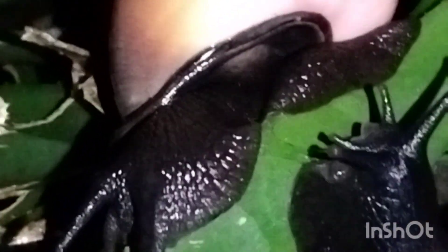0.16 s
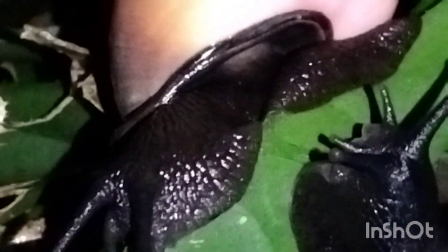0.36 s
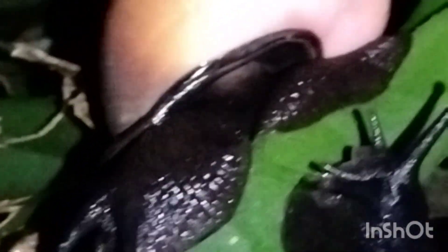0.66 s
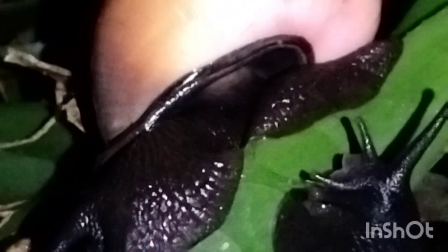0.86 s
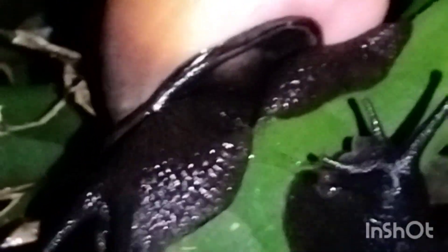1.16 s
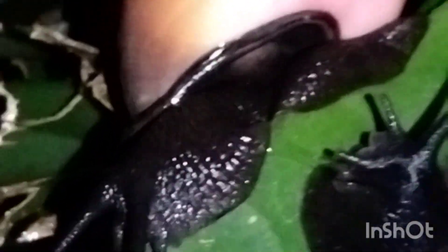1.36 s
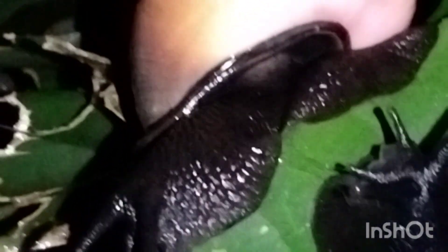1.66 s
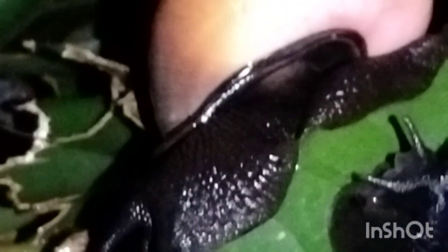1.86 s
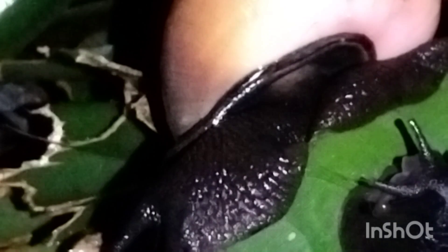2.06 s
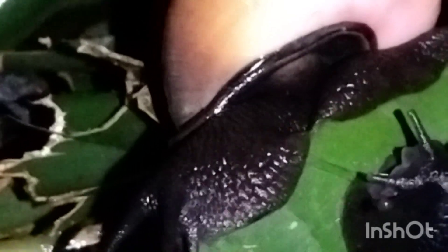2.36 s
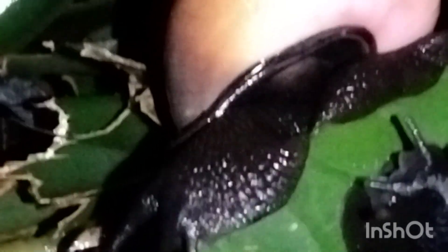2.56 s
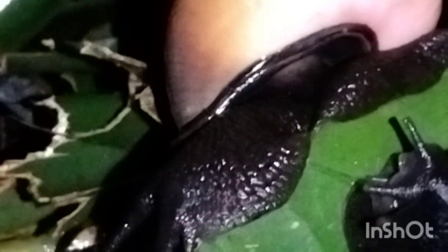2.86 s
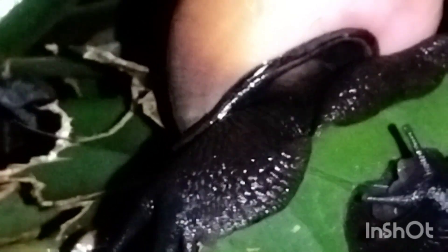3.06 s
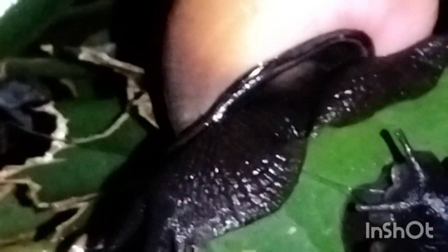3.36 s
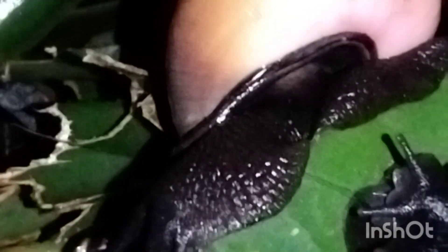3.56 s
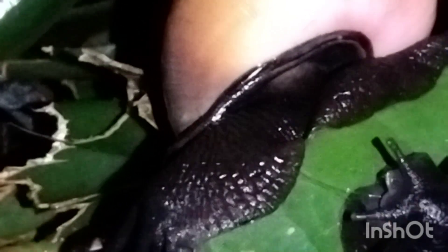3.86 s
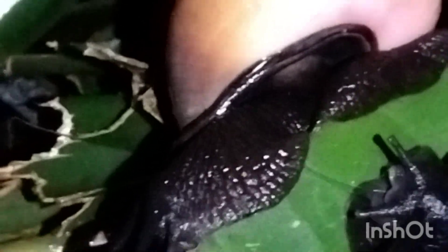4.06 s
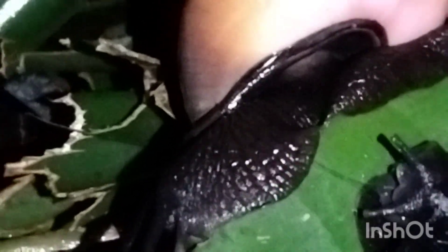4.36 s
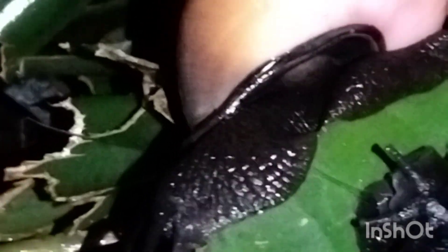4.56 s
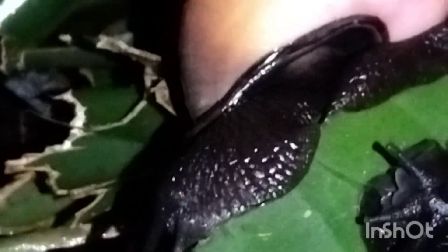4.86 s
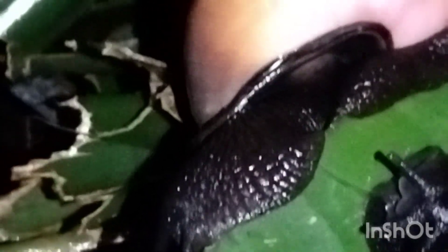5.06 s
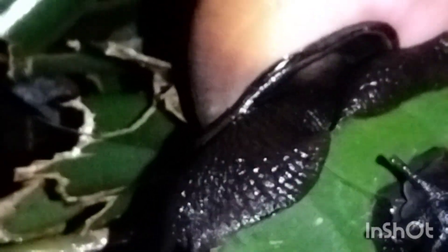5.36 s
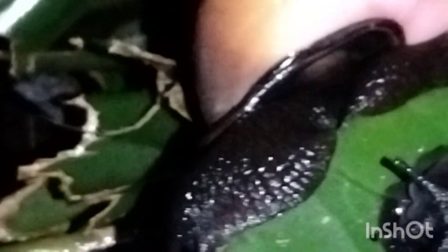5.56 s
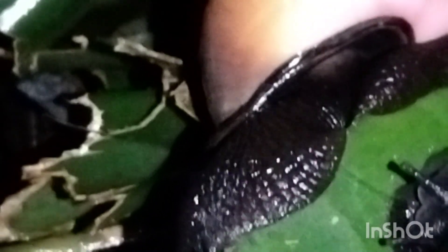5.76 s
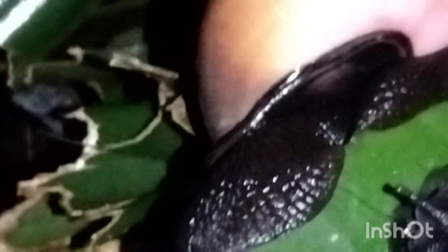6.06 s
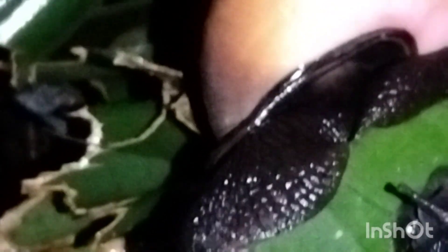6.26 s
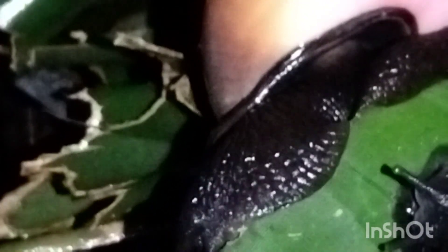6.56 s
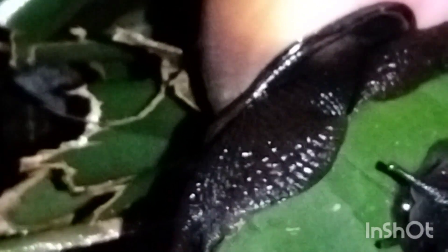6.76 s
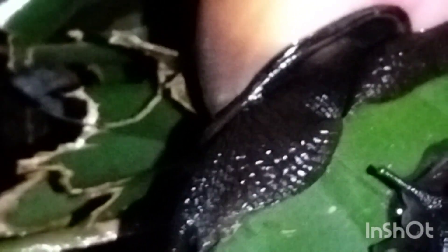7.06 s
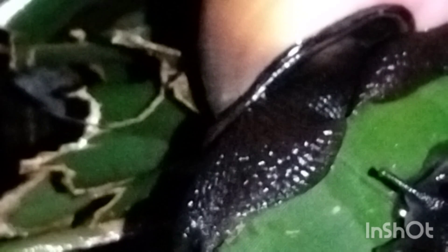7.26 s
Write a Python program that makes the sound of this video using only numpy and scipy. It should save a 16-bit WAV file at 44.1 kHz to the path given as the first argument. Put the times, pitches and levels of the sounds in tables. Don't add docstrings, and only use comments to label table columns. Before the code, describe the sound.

A wet garden at night, continuous from start to end, picked up by a phone held still among leaves, with slight noise-suppressed graininess and no extreme treble. A near tree cricket gives short chirps of five quick pulses, each falling slightly around 2.7 kHz, roughly every 0.37 s; one near 6.0 s has only three. Far frogs of two sizes croak in overlapping, rattling pulses, busy until about 2.5 s, thinner around 3-4.5 s, then led by the smaller frogs from 5 s. A strong, piercing cricket near 7.6 kHz chirps at 0.5, 1.9, 3.3, 4.7 and 6.2 s. Pulsed trills with upward-sweeping strokes near 5 kHz run about 1.0-1.9, 3.1-4.0 and 5.3-6.1 s. Other crickets shimmer constantly at 5.6 kHz and chirp in groups around 7 kHz. Drips tick brightly on leaves, notably at 1.5, 2.2, 2.4 and 7.0 s, with soft low thuds, clearest near 4.8 s.

```python
import sys
import numpy as np
from scipy import signal
from scipy.fft import rfft, irfft
from scipy.io import wavfile
from scipy.ndimage import uniform_filter1d

SR = 44100
rng = np.random.default_rng(int(sys.argv[2]) if len(sys.argv) > 2 else 0)


def attenuation_scalar(level_db):
    decades = np.asarray(level_db, float) / 20
    return 10 ** decades


def log_audio(samples):
    frames = np.atleast_2d(samples).T
    limited = np.clip(frames, -1, 1)
    pcm = np.round(limited * 32767).astype(np.int16)
    wavfile.write(sys.argv[1], SR, pcm)


N = 327663
TIME = np.arange(N) / SR


def add(out, x, t):
    i = int(t * SR)
    first, last = max(i, 0), int(np.clip(i + len(x), 0, N))
    out[first:last] += x[first - i:][:last - first]


def unit(x):
    return x / np.sqrt(np.mean(x ** 2))


def band(x, lo_hz, hi_hz, order=2):
    sos = signal.butter(order, [lo_hz, min(hi_hz, .45 * SR)], "band", fs=SR, output="sos")
    return signal.sosfilt(sos, x)


def walk(rate):
    hold = int(SR / rate)
    steps = np.repeat(rng.standard_normal(N // hold + 1), hold)
    return unit(uniform_filter1d(uniform_filter1d(steps, hold), hold)[:N])


def level_curve(table):
    s, db = np.transpose(table)
    return attenuation_scalar(np.interp(TIME, s, db))


def calls(starts, lengths, levels_db, attack, t60):
    power = np.full(N // 64 + 2, 1e-12)
    t = np.arange(len(power)) * 64 / SR
    for start, length, db in zip(starts, lengths, levels_db):
        swell = np.clip((t - start) / attack + (start <= 0), 0, 1)
        fade_db = -60 * np.clip(t - start - length, 0, None) / t60
        power += (swell * attenuation_scalar(db + fade_db)) ** 2
    return np.interp(TIME, t, np.sqrt(power))


def foliage(x, t60, wet_db):
    t = np.arange(int(.5 * SR)) / SR
    fade = np.exp(-np.log(1000) * t / t60) * (1 - np.exp(-t / 0.0027))
    tail = rng.standard_normal(len(t)) * fade
    return x + attenuation_scalar(wet_db) * signal.fftconvolve(x, tail / np.sqrt(np.sum(tail ** 2)))[:N]


def wing(phase, overtone, overtone_db):
    return np.sin(phase) + attenuation_scalar(overtone_db) * np.sin(overtone * phase)


def stroke(out, top_s, db, start_hz, end_hz, glide, rise, fall, overtone, overtone_db):
    t = np.arange(int((rise + fall) * SR)) / SR
    rising = np.sin(np.pi / 2 * t / rise)
    falling = np.cos(np.pi / 2 * np.clip((t - rise) / fall, 0, 1)) ** 1.3
    swell = np.where(t < rise, rising, falling) ** 1.5
    settling = np.exp(-t / glide)
    hz = end_hz + (start_hz - end_hz) * settling
    phase = 2 * np.pi * (np.cumsum(hz) / SR + rng.random())
    add(out, attenuation_scalar(db) * swell * wing(phase, overtone, overtone_db - 25 * settling), top_s - rise)


def trill(hz, rate, sharp, overtone_db, wander_hz):
    beat = rate * (TIME + rng.random()) + .05 * walk(3)
    phase = 2 * np.pi * np.cumsum(hz + wander_hz * walk(12)) / SR
    pulses = np.sin(np.pi * beat) * np.abs(np.sin(np.pi * beat)) ** sharp
    return pulses * wing(phase, 2, overtone_db + 5 * walk(4.4))


def air():
    # (frequency [Hz], density [dB per Hz])
    air_colour = [(25, -32), (60, -3.5), (120, -2), (250, 1), (600, 0), (1000, 1), (2400, 10.5),
                  (4600, -1.5), (5300, -1), (6300, 9.5), (7900, 10.5), (8600, -16), (11000, -13),
                  (15500, -19.5)]
    hz, db = np.transpose(air_colour)
    bins = np.arange(N // 2 + 1) * SR / N + 1
    hiss = rfft(rng.standard_normal(N)) * attenuation_scalar(np.interp(np.log(bins), np.log(hz), db))
    out = irfft(hiss * (bins < 4000), N)
    for lo_hz in range(4000, 16000, 300):
        patch = irfft(hiss * (bins >= lo_hz) * (bins < lo_hz + 300), N)
        out += attenuation_scalar(4.5 * walk(10)) * patch
    return attenuation_scalar(-70.5) * unit(out)


def far_tree_crickets():
    # (time [s], level [dB])
    far_levels = [
        (0, -62.5),
        (2.9, -65.5),
        (3.3, -58.5),
        (4.8, -58.5),
        (5.5, -68.5),
        (6.1, -60),
        (6.6, -59.5),
        (7.0, -62),
        (7.43, -63),
    ]
    pair = sum(trill(hz, hz / 70, 1.5, -55, 20) for hz in (2790, 2860))
    return level_curve(far_levels) * attenuation_scalar(2.6 * walk(5)) * unit(foliage(pair, 0.34, 0.5))


def steady_trill():
    # (time [s], level [dB])
    steady_levels = [(0.0, -57.5), (1.66, -60), (1.82, -59), (3.06, -62.5), (3.19, -65), (3.21, -63),
                     (3.79, -60), (4.14, -66.5), (4.16, -59.5), (4.26, -62.5), (5.4, -62), (6.06, -57),
                     (7.43, -59)]
    # (time [s], level [dB])
    late_levels = [
        (6.1, -60),
        (6.31, -79),
        (6.318, -72),
        (7.43, -65.5),
    ]
    near = trill(5657, 48.56, 5., -50, 3)
    neighbour = trill(5640, 97., .5, -50, 14)
    pair = unit(foliage(near + attenuation_scalar(-3.5) * neighbour, 0.18, -16.5))
    late = sum(trill(hz, hz / 50, 1.6, -55, 90) * attenuation_scalar(5 * walk(15)) for hz in (4520, 4640, 4780))
    late = (TIME > late_levels[0][0]) * unit(foliage(late, 0.3, 8))
    return level_curve(steady_levels) * pair + level_curve(late_levels) * late


def frog_pulses(rate):
    voices = np.zeros((6, N))
    for voice in voices:
        own_pace = 1 + .06 * rng.standard_normal()
        period = SR / rate * own_pace * (1 + .025 * rng.standard_normal(int(N / 100)))
        period *= 1 + .05 * np.resize(walk(6)[::int(SR / rate)], len(period))
        at = np.cumsum(period).astype(int)
        at = at[at < N]
        scatter_db = 3.22 * rng.standard_normal(len(at))
        voice[at] = attenuation_scalar(4.97 * walk(8)[at] + scatter_db)
    return voices


def frogs():
    # (low edge [Hz], high edge [Hz], pulse rate [Hz])
    frog_bands = [
        (1172.4, 1766, 125),
        (2590, 3564, 125),
        (1574, 2747, 182),
        (3454, 4422, 182),
    ]
    far_chorus_db = [
        -76,
        -66,
        -76.5,
        -77.5,
    ]
    # (start [s], length [s], throat level [dB], sac over throat [dB])
    big_croaks = [(0.0, 0.37, -52.5, 1), (0.28, 0.19, -49.5, 0), (0.47, 0.24, -50, 1.5),
                  (0.78, 0.15, -48.5, 3.1), (0.96, 0.28, -50.5, 2.5), (1.24, 0.29, -50, 2),
                  (1.53, 0.44, -51, 3), (1.71, 0.25, -56.5, -2.2), (2.0, 0.076, -48.5, 1.5),
                  (2.18, 0.21, -50, -0.5), (2.45, 0.29, -54, -0.2), (2.75, 0.18, -52.5, -1),
                  (3.09, 0.11, -58, 5), (3.29, 0.1, -59, -0.5), (3.49, 0.2, -57.5, 2.5),
                  (3.69, 0.25, -53, -0.5), (3.94, 0.097, -54, 0.5), (4.16, 0.12, -52.5, 4),
                  (4.44, 0.091, -65, 12.5), (4.67, 0.16, -60.5, 17.5), (5.12, 0.19, -68, 16.5),
                  (5.3, 0.17, -62, 10), (5.62, 0.16, -69, 12), (5.87, 0.056, -80, 6),
                  (6.15, 0.12, -72, 12.5), (6.41, 0.45, -67, -5.5), (6.73, 0.14, -54.5, -1.5),
                  (6.94, 0.12, -64, 8.5), (7.05, 0.016, -54.5, -10), (7.17, 0.22, -56, 5.5)]
    # (start [s], length [s], throat level [dB], sac over throat [dB])
    small_croaks = [(0.0, 0.12, -46, -3), (0.155, 0.28, -44, -5), (0.444, 0.36, -45.5, -4.5),
                    (0.691, 0.4, -51, -4.5), (1.027, 0.16, -51.5, -1.5), (1.199, 0.068, -48.5, -3.5),
                    (1.454, 0.1, -49, -3), (1.71, 0.11, -50, -2.5), (1.938, 0.11, -51, -12.5),
                    (2.193, 0.11, -51, -1), (2.42, 0.18, -56, -7), (2.634, 0.27, -52, -1.7),
                    (3.067, 0.069, -49, -1.5), (3.328, 0.08, -55.5, 2), (3.709, 0.13, -52.5, 1.5),
                    (3.895, 0.04, -51.5, -1.3), (4.154, 0.065, -50.5, 2), (4.316, 0.13, -56.5, 1),
                    (4.471, 0.078, -48, 0.2), (4.656, 0.26, -49.5, -1), (4.959, 0.27, -47, -3),
                    (5.291, 0.3, -45, -3.5), (5.656, 0.27, -46, -3.5), (5.858, 0.41, -47.5, -2.5),
                    (6.166, 0.2, -45, -4.5), (6.433, 0.22, -44.5, -3.5), (6.668, 0.25, -45, -4),
                    (6.956, 0.14, -44.5, -2.1), (7.089, 0.25, -46.5, -5), (7.342, 0.081, -48, 0.2)]
    # (throat [Hz], sac [Hz])
    big_rings = [(1401, 3030), (1437, 2980), (1440, 2990), (1463, 3700), (1444, 2970), (1415, 3000),
                 (1460, 2960), (1476, 2996), (1492, 3000), (1467, 3030), (1467, 3020), (1390, 2870),
                 (1460, 2860), (1480, 3200), (1440, 3040), (1543, 3200), (1496, 3260), (1500, 2990),
                 (1410, 3200), (1670, 7200), (1500, 2800), (1538, 2910), (1570, 2820), (1540, 2780),
                 (1550, 2830), (1500, 2600), (1400, 2870), (1456, 2950), (1520, 3060), (1490, 3060)]
    # (throat [Hz], sac [Hz])
    small_rings = [(1983, 3850), (1783, 3760), (1833, 3980), (1840, 3760), (1800, 3910), (1840, 3800),
                   (1760, 3910), (1700, 3710), (1810, 4300), (1820, 4060), (1750, 3700), (1860, 3870),
                   (1950, 3870), (2260, 3920), (1840, 4200), (1980, 3940), (1990, 3770), (1870, 4100),
                   (1950, 3880), (1870, 3810), (1867, 3800), (1764, 3770), (1970, 3820), (1830, 3780),
                   (1912, 3884), (1850, 3760), (1897, 3800), (1860, 3800), (1854, 3820), (1870, 3840)]
    out = np.zeros(N)
    pulses = [frog_pulses(frog_bands[0][2]), frog_pulses(frog_bands[2][2])]
    leaning = [walk(9), walk(9)]
    for k, (lo_hz, hi_hz, _) in enumerate(frog_bands):
        kind, is_sac = k // 2, k % 2
        start, length, throat_db, sac_db = np.transpose((big_croaks, small_croaks)[kind])
        gain = calls(start, length, throat_db + is_sac * sac_db - 1.32, attack=0.014, t60=0.53)
        croak = np.searchsorted(start, TIME, "right") - 1
        rings = np.array((big_rings, small_rings)[kind], float)
        ring_hz = uniform_filter1d(rings[croak, is_sac], size=900)
        climb = 1 - 0.074 * np.exp(-(TIME - start[croak]) / 0.074)
        lead_hz = ring_hz * climb * (1 + 0.022 * leaning[kind])
        span, chorus = hi_hz - lo_hz, 0
        for voice, hz in zip(pulses[kind], np.linspace(lo_hz, hi_hz, 8)[1:-1]):
            share = attenuation_scalar(-45 * np.abs(hz - lead_hz) / span)
            chorus = chorus + share * band(voice, hz - 0.18 * span, hz + 0.2 * span)
        chorus = band(foliage(chorus, 0.19, 1.0), lo_hz, hi_hz, order=6)
        chorus /= np.sqrt(uniform_filter1d(chorus ** 2, int(.2 * SR)) + 1e-12)
        out += np.hypot(gain, attenuation_scalar(far_chorus_db[k])) * chorus
    return out


def drips():
    # (time [s], peak [dB], duller part [dB], hissing tail [dB])
    leaf_ticks = [(0.3732, -54.5, -5, -22), (0.721, -61, -20, -29), (1.0234, -60, 4, -20),
                  (1.328, -64.5, -27, -18), (1.528, -50, -15.5, -25), (1.865, -67, -34, -18.5),
                  (2.0772, -61, -33.5, -17), (2.2252, -50.5, 7, -29), (2.4, -47, -9, -38.5),
                  (2.5262, -71.5, -9, -22), (2.668, -63.5, -20.5, -18.5), (2.818, -66.5, -31, -29),
                  (3.1368, -55.5, -9, -22), (3.6014, -66.5, -18, -19), (3.7275, -60.5, -17, -21),
                  (3.937, -66.5, -27.5, -39), (4.3876, -63, -2.5, -25), (4.757, -62.5, -9, -32.5),
                  (5.062, -67.5, -39, -21.5), (5.212, -64, -14.5, -13), (5.3674, -66.5, -1.5, -31.5),
                  (5.798, -56.5, -13, -19.5), (5.8678, -57.5, -20, -29.5), (6.1034, -69, -7.5, -34.5),
                  (6.417, -62.5, -5.5, -20), (6.797, -58.5, -10.5, -24.5), (6.929, -58.5, -15.5, -32),
                  (7.0472, -48, -1, -30)]
    # (time [s], peak [dB], ring [Hz])
    dull_rings = [(0.258, -74, 806), (0.387, -62.5, 825), (0.996, -66, 166), (1.022, -59, 800),
                  (1.35, -73, 730), (1.552, -62, 996), (1.672, -69.5, 830), (1.773, -64, 288),
                  (2.076, -89, 1010), (2.274, -72, 730), (2.313, -74, 884), (2.666, -57.5, 1010),
                  (2.713, -61, 564), (3.302, -64, 1200), (3.145, -59, 850), (3.391, -75, 506),
                  (3.583, -70, 715), (4.469, -60.5, 650), (4.756, -54.5, 587), (4.819, -51, 182),
                  (4.881, -57, 178), (5.162, -70.5, 660), (5.403, -75, 738), (5.903, -58, 1094),
                  (6.412, -60.5, 780), (6.421, -57, 770), (6.629, -71.5, 266), (7.164, -70, 248),
                  (7.264, -64, 533),
                  (.385, -67, 564), (6.78, -58.5, 1190), (4.29, -74, 403), (4.475, -65, 199),
                    (4.753, -59.5, 830), (4.826, -68, 272), (5.3, -52, 1274), (6.55, -57.5, 1220),
                    (6.97, -61, 1300), (7.058, -56, 1300), (6.418, -67, 282), (6.421, -53.5, 1156)]
    out, t = np.zeros(N), np.arange(int(.3 * SR)) / SR
    for at, db, dull_db, tail_db in leaf_ticks:
        fade = np.exp(-t / .0005) + attenuation_scalar(tail_db) * np.exp(-(t / 0.083) ** 1.3)
        burst = rng.standard_normal(len(t)) * fade
        patches = np.repeat(rng.standard_normal(40), 200)
        patches = uniform_filter1d(patches, size=150)[:len(t) // 2 + 1]
        burst = irfft(rfft(burst) * attenuation_scalar(4 * patches), len(t)) * (t < .25)
        bright = band(burst, 10870, 19000, order=4)
        dull = band(burst, 4100, 8800)
        add(out, attenuation_scalar(db + 11.5) * (bright + attenuation_scalar(dull_db) * dull), at)
    snap = rng.standard_normal(len(t)) * np.exp(-t / 0.003)
    add(out, attenuation_scalar(-29) * band(snap, 1200, 2200), 3.937)
    for at, db, hz in dull_rings:
        t60 = 0.19 * (600 / hz) ** 0.12
        body = unit(band(rng.standard_normal(len(t)), hz - 30 - 0.01 * hz, hz + 30 + 0.048 * hz))
        ring = body * np.exp(-np.log(1000) * t / t60) * (1 - np.exp(-t * hz / 0.44))
        add(out, attenuation_scalar(db - 3.0) * ring, at)
    return out


def near_field_cricket():
    # (first stroke top [s], strokes, spacing [ms], level [dB])
    near_chirps = [
        (0.4923, 7, 43.4, -31),
        (1.904, 7, 44.3, -30),
        (3.287, 7, 43.2, -30.5),
        (4.731, 6, 42.6, -31),
        (6.189, 6, 52, -30),
    ]
    out = np.zeros(N)
    for start, strokes, ms, db in near_chirps:
        for k in range(round(strokes)):
            weak_db = -6.5 * (k == 0) - 12 * (k == 6)
            stroke_db = db - 3 + weak_db - 1.5 * rng.standard_normal()
            stroke(out, start + k * ms / 1000 - .0015, stroke_db, 7630, 7655, glide=.006,
                   rise=.0085, fall=.008, overtone=2, overtone_db=-40)
    return foliage(out, .15, -9)


def field_crickets():
    group_hz = [
        6860,
        7060,
        7290,
        7530,
        7720,
    ]
    # (start [s], length [s], level [dB])
    lowest = [(0.0, 0.036, -50), (0.203, 0.27, -61.5), (0.898, 0.25, -51), (1.336, 0.18, -61),
              (2.012, 0.35, -49.5), (2.495, 0.27, -52.5), (3.224, 0.25, -51.5), (3.822, 0.21, -54.5),
              (4.391, 0.28, -51.5), (4.954, 0.29, -59), (5.586, 0.26, -49), (6.065, 0.28, -56.5),
              (6.749, 0.34, -52), (7.279, 0.085, -60)]
    # (start [s], level [dB])
    low = [(.2, -51.5), (.7, -57.5), (1.31, -51.5), (1.97, -63.5), (2.49, -56.5), (3.25, -52.5),
           (3.84, -53.5), (4.57, -59), (4.99, -59.5), (5.8, -64), (6.07, -56.5), (6.9, -57), (7.23, -61)]
    # (start [s], length [s], level [dB])
    middle = [(0.0, 0.22, -66), (0.48, 0.32, -55), (1.059, 0.38, -56), (1.801, 0.44, -51),
              (2.969, 0.17, -61), (3.251, 0.27, -48.5), (3.87, 0.19, -54), (4.65, 0.35, -53),
              (5.08, 0.19, -60), (5.799, 0.29, -51.5), (6.169, 0.19, -49.5), (6.7, 0.37, -68.5),
              (6.95, 0.63, -55.5)]
    # (start [s], length [s], level [dB])
    high = [(0.0, 0.37, -53.5), (0.48, 0.23, -46), (0.84, 0.23, -61), (1.227, 0.25, -59),
            (1.659, 0.37, -57.5), (1.899, 0.2, -44), (2.41, 0.25, -66.5), (2.79, 0.14, -60),
            (3.252, 0.31, -46), (3.639, 0.41, -65.5), (4.37, 0.36, -61), (4.73, 0.25, -45.5),
            (5.062, 0.26, -57.5), (5.659, 0.6, -67), (6.19, 0.24, -46.5), (6.529, 0.17, -54),
            (7.24, 0.32, -56)]
    # (start [s], level [dB])
    highest = [
        (0.069, -58.5),
        (1.14, -58),
        (2.38, -56.5),
        (3.6, -55.5),
        (4.42, -68),
        (5.061, -66.5),
        (5.94, -56.5),
        (7.141, -59.5),
    ]
    low, highest = ([(s, 0.24, db) for s, db in chirps] for chirps in (low, highest))
    out = np.zeros(N)
    for chirps, hz in zip((lowest, low, middle, high, highest), group_hz):
        group = 0
        for off_hz in (-28, 28):
            throb = .6 + np.cos(np.pi * 23. * (TIME + rng.random())) ** 2
            group = group + throb * trill(hz + off_hz, 95.0 + off_hz / 40, 0.3, -34.0, 25.04)
        gain = attenuation_scalar(-2.5) * calls(*np.transpose(chirps), attack=0.036, t60=0.53)
        out += gain * unit(foliage(group, 0.018, 0.56))
    return out


def rising_trill():
    # (first pulse top [s], pulses, spacing [ms], level [dB])
    trills = [
        (1.0232, 32, 28.64, -49),
        (3.0993, 32, 28.76, -49),
        (5.297, 30, 28.67, -49),
    ]
    lazy_hz = [
        4640,
        4770,
        4740,
        4820,
        4820,
        4880,
    ]
    out, overtone = np.zeros(N), np.zeros(N)
    for start, pulses, ms, db in trills:
        for k in range(round(pulses)):
            at, pulse_db = start + k * ms / 1000, db + 1.5 * rng.standard_normal()
            if k < len(lazy_hz):
                stroke(out, at - .002, pulse_db - 3 * (k == 0), lazy_hz[k] - 90, lazy_hz[k] + 40,
                       glide=.006, rise=.005, fall=.008, overtone=3, overtone_db=-50)
            else:
                stroke(out, at + .002, pulse_db - 1, 4560, 5110,
                       glide=.0055, rise=.009, fall=.010, overtone=3, overtone_db=-40)
                stroke(overtone, at + .002, pulse_db, 14850, 15150,
                       glide=.004, rise=.005, fall=.006, overtone=1, overtone_db=-60)
    return attenuation_scalar(1.0) * foliage(out, .18, -5) + attenuation_scalar(-16.5) * foliage(overtone, 0.1, -11)


def tree_cricket():
    # (first pulse top [s], pulses, spacing [ms])
    tree_chirps = [(-0.0775, 5, 25.6), (0.3197, 5, 25.28), (0.7194, 5, 25.8), (1.1598, 5, 25.26),
                   (1.532, 5, 25.72), (1.8991, 5, 25.74), (2.2345, 5, 25.68), (2.6299, 5, 25.81),
                   (3.0086, 5, 25.48), (3.3979, 5, 25.36), (3.7592, 5, 25.82), (4.1172, 5, 25.66),
                   (4.4733, 5, 25.55), (4.8452, 5, 25.57), (5.2147, 5, 25.71), (5.5774, 5, 25.57),
                   (5.9999, 3, 25.34), (6.2817, 5, 25.51), (6.6725, 5, 25.37), (7.0898, 5, 25.7),
                   (7.424, 1, 25.6)]
    out = np.zeros(N)
    for start, pulses, ms in tree_chirps:
        for k in range(round(pulses)):
            slip_db, slip_hz = rng.standard_normal(2)
            top_s = start + k * ms / 1000 - .0016
            stroke(out, top_s, .8 * slip_db, 2815 + 15 * slip_hz, 2600, glide=.013,
                   rise=.006, fall=.0165, overtone=3, overtone_db=-28)
    return attenuation_scalar(-43.5) * unit(foliage(out, 0.11, -11))


def scene():
    far = air() + far_tree_crickets() + steady_trill() + frogs()
    near = drips() + near_field_cricket() + field_crickets() + rising_trill() + tree_cricket()
    return (far + near)[None]


def denoise(x, strength, floor_db):
    hz, _, cells = signal.stft(x, SR, nperseg=1024, noverlap=768)
    hz = hz[:, None]
    power = uniform_filter1d(uniform_filter1d(np.abs(cells) ** 2, size=3, axis=0), size=5, axis=1)
    steady = uniform_filter1d(np.percentile(power, 25, axis=1), size=9)[:, None] * (hz > 1100)
    gain = np.clip(1 - strength * steady / (power + 1e-18), attenuation_scalar(2 * floor_db), 1) ** .5
    loud = np.max(power[(hz[:, 0] > 6500) & (hz[:, 0] < 7900)], axis=0)
    mask = loud * attenuation_scalar(2 * (-35 - 7 * (hz - 8000) / 1000))
    gain *= (uniform_filter1d(power, size=9, axis=0) > mask) | (hz < 7950)
    return signal.istft(cells * gain, SR, nperseg=1024, noverlap=768)[1][:N]


def roll_off(x):
    return signal.sosfilt(signal.butter(12, 16190, fs=SR, output="sos"), x)


def record(dry):
    top_cut = signal.ellip(10, .2, 60, 15680, fs=SR, output="sos")
    clean = denoise(dry[0], strength=0.37, floor_db=-3.5)
    mix = signal.sosfilt(top_cut, clean)[None]
    return roll_off(mix)


dry = scene()
out = record(dry)
log_audio(out)
```